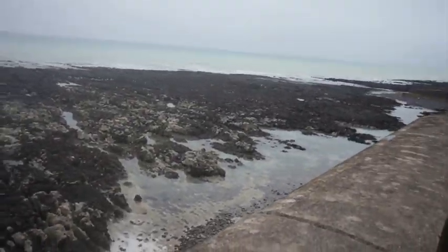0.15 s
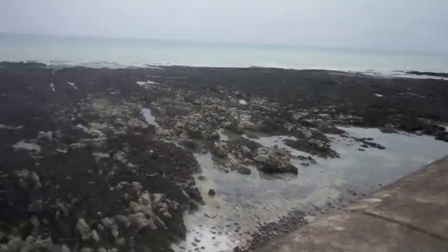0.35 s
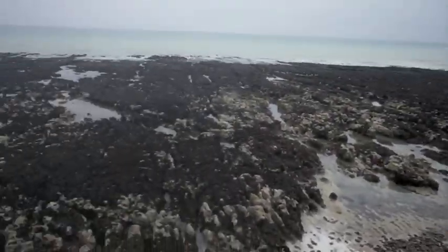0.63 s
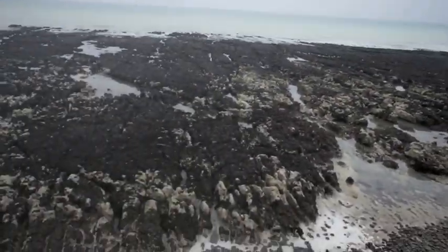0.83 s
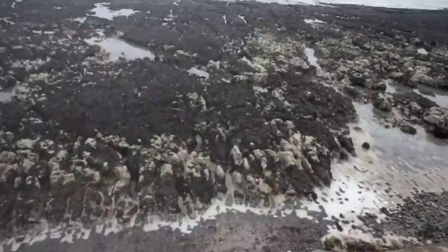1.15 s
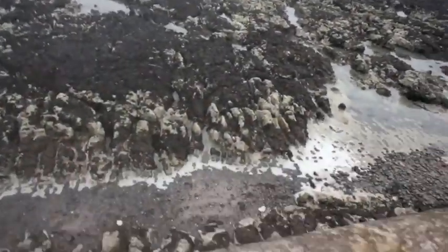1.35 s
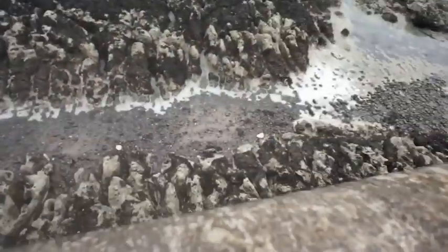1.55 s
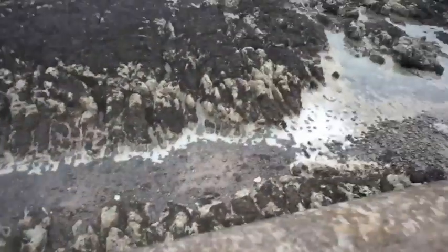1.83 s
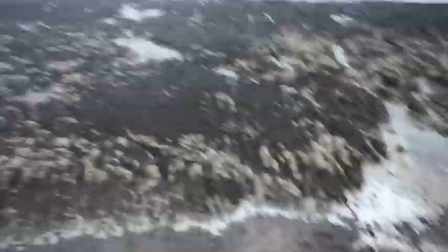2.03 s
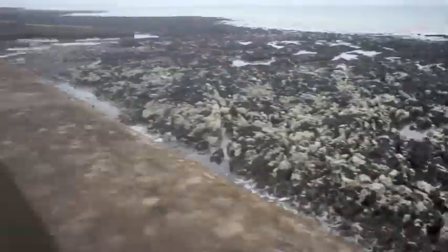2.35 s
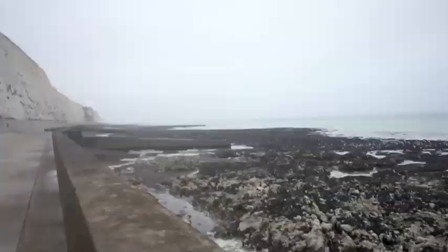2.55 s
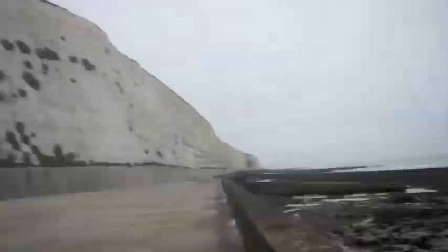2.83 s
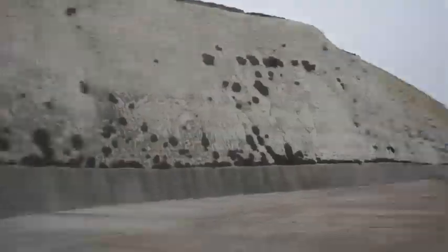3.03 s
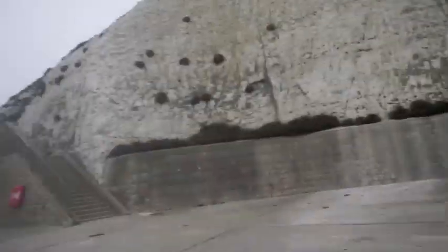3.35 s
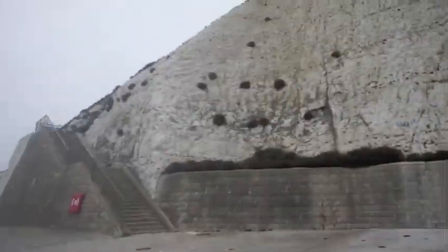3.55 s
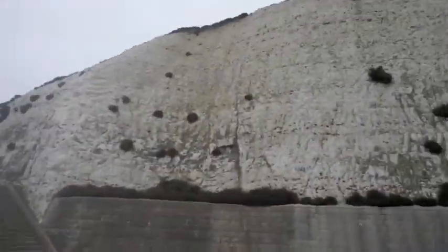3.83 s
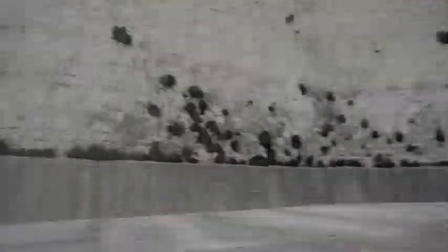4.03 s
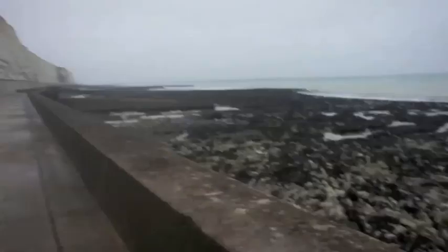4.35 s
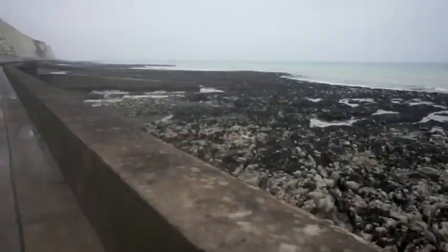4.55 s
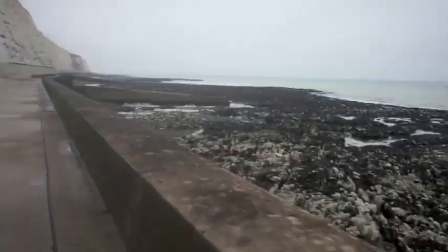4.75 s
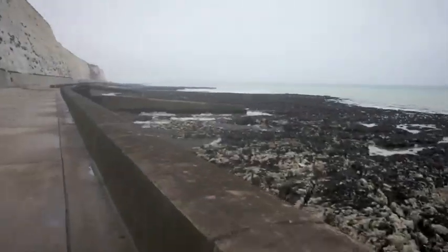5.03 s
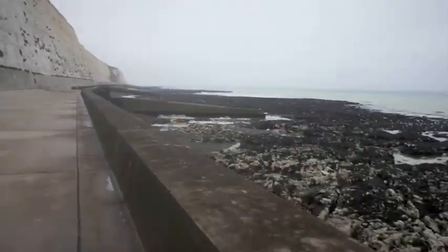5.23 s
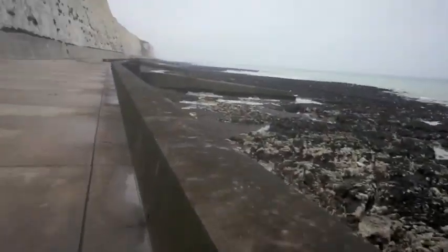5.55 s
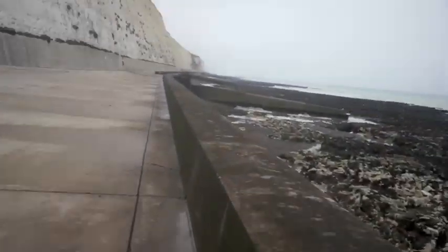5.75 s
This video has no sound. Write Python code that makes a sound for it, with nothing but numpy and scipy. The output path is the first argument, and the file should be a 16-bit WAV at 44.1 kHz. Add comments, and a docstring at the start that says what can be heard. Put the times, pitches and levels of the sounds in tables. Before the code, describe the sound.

A few small birds call close by on a grey rocky shore under a cliff: thin whistles and peeps first, then drawn-out cries, a twittering run, short reedy chips, abrupt squeals and a quick trill that tires. Faint echoes return from hard walls. Distant surf hisses softly. After the first half second wind crackles and thumps on the hand-held microphone, swinging from left to right.

```python
"""Shore birds at a windy sea wall

Under a chalk cliff at low tide, small birds squabble in thin, high, falling chirps that end in a fast trill.
Their voices are harmonic oscillators with gliding pitch; cliff and concrete return faint echoes.
Distant surf is shaped noise. Gusts on the two ports of a hand-held camera are impulsive turbulence and
damped resonances, weak in the bass; inverted crosstalk widens their stereo."""
import sys
import numpy as np
from scipy import signal
from scipy.fft import rfft, irfft, next_fast_len
from scipy.io import wavfile
from scipy.ndimage import uniform_filter1d, minimum_filter1d, map_coordinates

SR = 44100
rng = np.random.default_rng(int(sys.argv[2]) if len(sys.argv) > 2 else 0)


def file_out(sig):
    """Save sig as 16-bit WAV at sys.argv[1]."""
    # one column per channel
    cols = np.atleast_2d(sig).T
    # limit, then scale
    lim = np.clip(cols, -1, 1)
    pcm = np.round(lim * 32767).astype(np.int16)
    wavfile.write(sys.argv[1], SR, pcm)


N = 260190
TOP_HZ = 15900  # upper band limit


def amp(db):
    """Logarithmic level: decibels to amplitude gain."""
    return 10 ** (np.asarray(db) / 20)


def unit(x):
    """Normalization: x at rms 1."""
    return x / np.sqrt(np.mean(x ** 2) + 1e-20)


def along(points, hz):
    """Logarithmic frequency scale: (f/Hz, value) points interpolated at hz."""
    f, v = np.transpose(points)
    return np.interp(np.log(hz + 1), np.log(f + 1), v)


def curves(rows):
    """Linear envelopes: one value per sample for each column after the time."""
    s, *cols = np.transpose(rows)
    return [np.interp(np.arange(N) / SR, s, c) for c in cols]


def wobble(rate):
    """Slow random modulation: a smooth curve through rate random knots a second."""
    knots = rng.standard_normal(int(N * rate / SR) + 4)
    return map_coordinates(knots, [np.arange(N) * rate / SR])


def filtered(x, response):
    """Linear filtering: the spectrum of x times a response of frequency."""
    m = next_fast_len(N + SR // 4)
    return irfft(rfft(x, m) * response(np.fft.rfftfreq(m, 1 / SR)), m)[..., :N]


def panned(left_db):
    """Interchannel level difference: left and right gains of mean power 1."""
    return unit(amp([[left_db / 2], [-left_db / 2]]))


def add(track, s, sound):
    """Superposition: mix a stereo sound into the track from time s."""
    part = track[:, max(round(s * SR), 0):][:, :sound.shape[1]]
    part += sound[:, :part.shape[1]]


def rush(spectrum, alike, patchy_db):
    """Partially coherent noise: shaped stereo noise of rms 1 with patches of random gain."""
    z = signal.stft(rng.standard_normal((2, N)), nperseg=512)[2]
    field = rng.standard_normal(z.shape[1:])
    field = uniform_filter1d(uniform_filter1d(field, size=6, axis=0), size=12, axis=1)
    pair = signal.istft(z * amp(patchy_db * unit(field)), nperseg=512)[1][:, :N]

    def mid_side_response(hz):
        # the mid-side balance sets the correlation of left and right
        angle = np.arccos(np.clip(along(alike, hz), -1, 1)) / 2
        return amp(along(spectrum, hz)) * [np.cos(angle), np.sin(angle)]

    mid, side = filtered(pair, mid_side_response)
    return unit(np.array([mid + side, mid - side]))


# spectra of distant surf and of a fine hiss: (f/Hz, relative density level/dB)
SURF_SPECTRUM = [(25, -31), (150, -28.5), (300, -18), (600, -11), (1100, -1.5), (2000, -2), (3200, -3),
                 (5000, -2), (7000, -20.5), (15000, -42)]
HISS_SPECTRUM = [(200, -40), (1500, -23), (4000, -3), (6000, 3), (9000, 3.5), (11500, -2.5), (13000, -2),
                 (15800, -21)]
# left-right correlation of the surf: (f/Hz, coefficient)
SURF_CORRELATION = [(100, 0.31), (300, 0.2), (700, 0.8), (1400, 0.93), (3000, 0.49), (6000, -0.33)]
# course of both: (t/s, relative surf level/dB, relative hiss level/dB)
SEA_LEVELS = [(0.0, -44, -47.5), (1.95, -48, -49.5), (2.51, -43, -48.5), (2.63, -44, -48.5),
              (3.79, -44.5, -46), (4.42, -46.5, -49.5), (4.83, -43.5, -48.5), (5.29, -44.5, -48),
              (5.62, -43, -49), (5.9, -46.5, -53.5)]


def sea():
    """Broadband noise radiation: far surf with a fine hiss above it."""
    surf_db, hiss_db = curves(SEA_LEVELS)
    surf = amp(surf_db + 6.5) * rush(SURF_SPECTRUM, SURF_CORRELATION, patchy_db=1.5)
    hiss = amp(hiss_db + 10.0) * rush(HISS_SPECTRUM, [(3000, 0.21), (8000, -0.54)], patchy_db=3)
    return surf + hiss


THIRD_HZ, THIRD_SKIRT_HZ = 12650, 700  # resonance of the third partial: centre, half width
ONSET_SHAKE, ONSET_SHAKE_S = 1.63, 0.0079  # extra pitch unsteadiness at the start, its decay time
RASP_HZ = (5000, 13000)  # band of the harsh noise


def voice(pitch, swell_db, db, octave_db, pan_db, shape, sag_db=0, flutter_db=2.0,
          attack=0.0015, release=0.002, port_lag=2.2e-5):
    """Harmonic oscillator: a wavering tone with two overtones and band noise follows a given pitch."""
    t = np.arange(len(pitch)) / SR

    def jitter(rate):
        return map_coordinates(rng.standard_normal(256), [t * rate], mode="wrap")

    # the pitch is shakiest while the voice starts
    unsteady = shape["waver"] * (1 + ONSET_SHAKE * np.exp(-t / ONSET_SHAKE_S))
    wavering = pitch * (1 + unsteady * (jitter(82.8) + 0.81 * jitter(441)))
    phase = 2 * np.pi * np.cumsum(wavering) / SR
    gate = np.clip(t / attack, 0, 1) * np.clip((t[-1] - t) / release, 0, 1)
    swell = gate * amp(3.5 + swell_db + shape["rough_db"] * jitter(522))
    # the sound reaches one port a little before the other
    lead = np.pi * pitch * port_lag * np.array([[-1], [1]])
    # the third partial flares as it crosses its resonance
    off_peak_db = 10 * np.log10(1 + ((3 * pitch - THIRD_HZ) / THIRD_SKIRT_HZ) ** 4)
    levels = [db, octave_db - sag_db, octave_db + shape["third_db"] - off_peak_db]
    tone = 0
    for k, level in enumerate(levels, 1):
        partial = np.sin(k * (phase + lead)) * (k * pitch < TOP_HZ)
        tone = tone + amp(level + flutter_db * jitter(158.0)) * partial
    rasp_band = signal.butter(2, RASP_HZ, "band", fs=SR, output="sos")
    noise = signal.sosfilt(rasp_band, rng.standard_normal((2, SR // 3)))
    rasp = amp(octave_db + shape["rasp_db"]) * noise[:, :len(t)]
    return panned(pan_db) * swell * (tone + rasp)


def chirp(length, crest_hz, db, octave_db, pan_db, shape):
    """Frequency modulation: pitch glides to a crest and drops; the octave weakens away from the crest."""
    t = np.arange(int((length + 0.0011) * SR)) / SR
    fall = min(shape["fall_s"], length)
    rising = np.clip(1 - t / shape["rise_s"], 0, 1)
    falling = np.maximum((t - length) / fall + 1, 0)
    glide = 1 + (shape["start"] - 1) * rising ** 2 + (shape["end"] - 1) * falling ** 1.6
    pitch = crest_hz * glide
    accent_db = shape["accent_db"] * np.sin(np.pi * np.minimum(falling, 1))
    swell_db = shape["onset_db"] * rising ** 2 + shape["tail_db"] * falling ** 2 + accent_db
    sag_db = 66 * np.abs(1 - pitch / crest_hz)
    return voice(pitch, swell_db, db, octave_db, pan_db, shape, sag_db=sag_db)


# reverberation time of the cliff tail: (f/Hz, T60/s)
CLIFF_T60 = [(3000, 0.48), (6000, 0.2), (11000, 0.26), (15000, 0.12)]


def cliff(x, early_db=4, early_t60=0.18):
    """Diffuse reflection: quick scatter off wall and rocks, then a weak tail shorter in the treble."""
    hz, t, z = signal.stft(rng.standard_normal((2, SR // 3)), SR, nperseg=256)
    late = amp(-60 * t / along(CLIFF_T60, hz)[:, None])
    early = amp(early_db - 60 * t / early_t60)
    tail = signal.istft(z * (late + early), SR, nperseg=256)[1]
    tail = tail * np.clip(np.arange(tail.shape[1]) / SR / 0.0085, 0, 1)
    return signal.fftconvolve(x, tail / np.linalg.norm(tail[0]), axes=1)


# hard surfaces near by: (nominal delay t/s, relative level/dB)
WALL_ECHOES = [(.0065, -26), (.012, -14.5), (0.025, -21.5), (.037, -20.5)]


def add_echoing(track, s, call, wet_db, cliff_db=-8, path_scatter=.1):
    """Specular and diffuse reflection: a call, its cliff blur and wall echoes whose paths vary by call."""
    add(track, s, call)
    add(track, s, amp(cliff_db + wet_db) * cliff(call))
    for delay, db in WALL_ECHOES:
        path_s = delay * (1 + path_scatter * rng.standard_normal())
        add(track, s + path_s, amp(db + wet_db) * call[::-1])  # mirrored left to right


def chirps(rows, shape):
    """Superposition: every chirp of one kind, with its echoes."""
    track = np.zeros((2, N))
    for s, *row in rows:
        add_echoing(track, s, chirp(*row, shape), shape["wet_db"])
    return track


# Keys of every call shape: glide and drop times, start and end pitch over the crest, start level,
# accent halfway down the drop, level at its end, third partial against the octave, pitch unsteadiness,
# fast level flutter, harsh noise against the octave, echo strength.
# whistles: (t/s, length t/s, settled f/Hz, relative level/dB)
WHISTLES = [(0, 0.27, 8630, -47), (0.492, 0.057, 8750, -55), (.66, .08, 8450, -46), (0.8, .1, 8270, -50),
            (5.79, 0.17, 8300, -34.5)]
WHISTLE = dict(rise_s=0.063, fall_s=0.026, start=1.11, end=0.37, onset_db=-8, accent_db=2, tail_db=-3,
               third_db=-40, waver=0.0055, rough_db=2, rasp_db=-20, wet_db=-0.5)


def whistles():
    """Nearly pure tones: thin whistles slide down, settle and drop."""
    rows = [(s, length, hz, db, db - 40, 0) for s, length, hz, db in WHISTLES]
    return chirps(rows, WHISTLE)


# peeps: (t/s, length t/s, crest f/Hz, relative fundamental level/dB, relative octave level/dB, L-R level/dB)
PEEPS = [(.315, 0.067, 5860, -34, -24, -7), (.716, 0.073, 5820, -30.5, -22.5, 1.5),
         (1.126, 0.066, 5595, -32.5, -24, -0.5), (1.371, 0.071, 5600, -36.5, -27, 0.5),
         (1.626, 0.054, 5700, -34.5, -22, -1), (1.764, 0.085, 5590, -40, -45, -2),
         (1.816, 0.06, 5720, -40, -27, 1), (1.925, 0.063, 5710, -35, -32, -5),
         (2.006, 0.073, 5510, -41, -32, -1), (2.1, 0.056, 5650, -29.5, -30, -5),
         (2.183, 0.089, 5590, -58, -35.5, -4), (2.712, 0.14, 5450, -52, -38.5, -9),
         (2.94, 0.084, 5500, -59, -40, -9), (3.125, 0.071, 5640, -58, -41, -3),
         (3.86, .06, 5350, -55, -44, 0), (4.05, .06, 5450, -54, -43, 0), (4.26, .06, 5400, -58, -45, -2),
         (4.45, .06, 5420, -58, -46.5, 0), (4.689, 0.045, 5800, -31.5, -36.5, 1),
         (4.73, 0.031, 4920, -32.5, -40, 1)]
PEEP = dict(rise_s=0.0119, fall_s=.055, start=0.93, end=.88, onset_db=-12, accent_db=2, tail_db=-3.5,
            third_db=7, waver=0.0059, rough_db=1.5, rasp_db=-24.5, wet_db=-2)


def peeps():
    """Downward frequency modulation: slow falling peeps."""
    return chirps(PEEPS, PEEP)


# spectrum of wind on a port: (f/Hz, relative density level/dB)
PORT_SPECTRUM = [(25, -40), (110, -39), (170, -32), (250, -22.5), (370, -12.5), (550, -5.5), (800, -0.5),
                 (1100, -0.5), (1600, -5), (2200, -14.5), (3200, -27), (5000, -50), (12000, -77)]


def port(drive, tilt_db, cross=0.3):
    """Spectral colouring: ports shape the turbulence; inverted crosstalk widens the stereo."""
    def colour(hz):
        octaves = np.log2(np.clip(hz, 600, 3000) / 1000)
        return unit(amp(along(PORT_SPECTRUM, hz) + tilt_db * octaves))

    sound = filtered(drive, colour)
    return sound - cross * sound[::-1]


def eddies(count, rate=1100, hiss_db=-21):
    """Poisson-like impulse noise: irregular tiny slaps over a little smooth noise, apart on each port."""
    slap_gains = (rng.random((2, count)) < rate / SR) + amp(hiss_db)
    return np.array([unit(side) for side in slap_gains * rng.standard_normal((2, count))])


# which port faces the wind as the camera turns: (t/s, L-R level/dB before widening)
WINDWARD = [(0.5, 13), (0.65, 12), (2.17, 11), (2.42, -2.5), (2.98, 6.5), (3.01, -10), (3.4, -15),
            (4.24, -8), (4.32, 4.5), (5.3, 2.5), (5.4, -20), (5.46, 5), (5.52, -17), (5.57, 1),
            (5.85, -1.5), (5.9, 1)]


def windward():
    """Directional exposure: the level difference between the ports at each sample."""
    return curves(WINDWARD)[0]


# lulls in the breeze: (t/s, length t/s)
LULLS = [(0.678, 0.072), (1.221, 0.05), (1.715, 0.028), (1.894, 0.034), (2.142, 0.015), (2.876, 0.027),
         (3.318, 0.011), (4.536, .04), (5.035, .068), (5.343, 0.043), (5.683, .045)]


def lulls(depth_db=-7.5, edge_s=0.0035):
    """Amplitude modulation: the gain of the breeze falls away in each lull."""
    t = np.arange(N) / SR
    dips = sum(np.clip(np.minimum(t - s, s + length - t) / edge_s + .5, 0, 1) for s, length in LULLS)
    return amp(depth_db * dips)


# wind between gusts: (t/s, relative level/dB)
BREEZE = [(0.5, -44.5), (0.83, -40), (0.96, -36.5), (1.21, -40.5), (1.6, -35.5), (1.85, -40.5),
          (2.15, -36.5), (2.47, -42.5), (3.24, -45), (3.4, -37.5), (3.79, -41), (4.14, -44.5), (4.29, -38),
          (4.82, -40), (5.18, -42.5), (5.9, -36.5)]
BREEZE_DB, BREEZE_FROM_S, BREEZE_LUMPS_DB = 5.5, 0.434, 4  # gain, when it gets up, quick random swings


def breeze(fine_db=-0.5, stray_db=-9):
    """Turbulent pressure noise: a lumpy breeze crackles with dense and stray eddies."""
    t = np.arange(N) / SR
    sides = amp(windward() * np.array([[.5], [-.5]]))
    sides = sides / np.sqrt(np.mean(sides ** 2, axis=0))
    level = amp(curves(BREEZE)[0] + BREEZE_DB + BREEZE_LUMPS_DB * wobble(60))
    level = level * lulls() * np.clip((t - BREEZE_FROM_S) / 0.047, 0, 1)
    crackle = amp(fine_db) * eddies(N) + amp(stray_db) * eddies(N, rate=160, hiss_db=-54)
    return port(level * sides * crackle, tilt_db=-6.0)


# gusts on the ports: (t/s, length t/s, relative level/dB)
PUFFS = [(0.478, 0.093, -31.5), (1.151, 0.026, -28.5), (1.392, 0.051, -30), (1.523, 0.049, -32.5),
         (1.567, 0.033, -31), (1.614, 0.04, -35), (1.747, 0.029, -34), (1.83, 0.069, -29),
         (2.008, 0.053, -28.5), (2.09, 0.05, -32.5), (2.161, 0.06, -24.5), (2.208, 0.037, -28),
         (2.326, 0.042, -27.5), (2.549, 0.031, -35.5), (2.908, 0.087, -26), (3.229, 0.1, -27),
         (3.356, 0.086, -25), (3.466, 0.13, -28), (3.72, 0.066, -28), (4.007, 0.03, -22.5),
         (4.097, 0.14, -27), (4.229, 0.034, -30), (4.3, 0.053, -24), (4.343, 0.036, -28),
         (4.381, 0.07, -28), (4.466, 0.024, -29), (4.582, 0.038, -29.5), (4.678, 0.18, -27.5),
         (4.916, 0.028, -27.5), (4.959, 0.049, -29), (5.125, 0.047, -28), (5.195, 0.067, -26.5),
         (5.256, 0.064, -26.5), (5.4, 0.037, -30.5), (5.447, 0.053, -30.5), (5.505, 0.053, -31.5),
         (5.592, 0.044, -17.5), (5.733, 0.065, -21), (5.852, 0.06, -23)]
PUFF_DB, PUFF_ATTACK_S, PUFF_RELEASE_S, PUFF_SAG_DB = -0.8, 0.0078, 0.013, 0.5  # gain, edges, loss over length


def puffs(half_hard_db=-25, blend_db=1.5, side_gain=1.84, flutter_db=1.5):
    """Level-dependent spectrum: the harder a gust blows, the brighter its sputter."""
    t = np.arange(N) / SR
    soft, hard = np.zeros((2, N)), np.zeros((2, N))
    side_db = windward()
    flutter = amp(flutter_db * wobble(130))
    for s, length, db in PUFFS:
        u = t[:int(length * SR)]
        edges = np.clip(u / PUFF_ATTACK_S, 0, 1) * np.clip((length - u) / PUFF_RELEASE_S, 0, 1)
        shape = edges * amp(-PUFF_SAG_DB * u / length) * np.interp(s + u, t, flutter)
        sputter = np.array([unit(side) for side in shape * eddies(len(shape))])
        pan_db = side_gain * np.interp(s + length / 2, t, side_db)
        blow = amp(db + PUFF_DB) * panned(pan_db) * sputter
        hard_share = 1 / (1 + np.exp((half_hard_db - db) / blend_db))
        add(soft, s, np.sqrt(1 - hard_share) * blow)
        add(hard, s, np.sqrt(hard_share) * blow)
    return port(soft, tilt_db=-6.0) + port(hard, tilt_db=10.0)


# hard eddies: (t/s, relative level/dB, nominal ring f/Hz, L-R level/dB before widening)
SLAPS = [(0.485, -18, 1580, 11), (0.502, -12.5, 665, 3), (0.53, -9.5, 804, 4), (0.627, -16.5, 770, 3),
         (0.768, -18, 970, 7), (0.797, -15.5, 870, 9.5), (0.823, -22, 1160, 8.0), (0.855, -11.5, 1090, 7),
         (0.881, -20, 867, 8.0), (0.899, -16.5, 767, 5), (0.931, -17, 929, 4), (0.95, -18, 993, 4),
         (0.969, -16, 715, 8), (1.032, -13, 832, 6), (1.073, -17, 1150, 12), (1.09, -14, 729, 9.5),
         (1.112, -15.5, 674, 8), (1.156, -13, 845, 11), (1.171, -15, 1020, 8), (1.206, -17, 950, 10),
         (1.251, -21, 794, 7), (1.303, -8.5, 980, 5), (1.345, -21, 720, 8.5), (1.394, -16, 842, 7),
         (1.411, -17, 1230, 9), (1.421, -22, 1160, 10), (1.46, -18, 888, 8), (1.49, -30, 800, 9),
         (1.539, -20, 1030, 10.5), (1.552, -23, 1010, 9.5), (1.59, -21, 890, 13), (1.632, -17, 689, 9),
         (1.644, -26, 926, 8.5), (1.689, -12.5, 1020, 10.5), (1.699, -25, 1030, 8.5), (1.794, -15, 824, 6),
         (1.838, -9.5, 730, 8), (1.861, -16, 953, 10), (1.87, -11, 1190, 14), (1.879, -13, 1060, 9),
         (1.984, -21.5, 930, 8.0), (2.015, -14.5, 791, 10), (2.027, -12.5, 670, 9),
         (2.045, -14.5, 800, 9.5), (2.086, -12.5, 727, 10.0), (2.104, -17, 700, 9.5),
         (2.124, -17.5, 646, 10), (2.165, -15, 1780, 13), (2.179, -26, 1080, 9.5), (2.206, -18, 972, 9.5),
         (2.223, -20, 746, 11), (2.334, -19, 940, 10), (2.351, -11, 1410, 7), (2.494, -17, 890, 1.5),
         (2.53, -23, 890, 1), (2.563, -15, 800, 11), (2.925, -8.5, 800, 12), (3.42, -16, 1150, -13),
         (3.739, -12, 1560, -10), (3.97, -14, 910, -8.0), (4.018, -19, 869, -10.0), (4.119, -9, 1160, -13),
         (4.164, -13, 1070, -6), (4.198, -11, 1380, -6), (4.306, -12, 816, 8.5), (4.318, -13, 950, 6),
         (4.328, -10, 1650, 10.0), (4.398, -11, 1190, 15), (4.41, -10, 1050, 12), (4.423, -13, 910, 8),
         (4.492, -15.5, 1070, 1), (4.506, -9, 1270, 13), (4.525, -17.5, 1240, 2), (4.594, -14, 1020, 11),
         (4.651, -13, 1020, 8), (4.656, -8, 1110, 11), (4.66, -8, 1070, 4), (4.743, -10, 1470, 10),
         (4.765, -20, 1210, -2), (4.801, -9.5, 1030, 4), (4.82, -14, 930, 10.5), (4.824, -11, 1290, 7),
         (4.833, -10.5, 925, 7.0), (5.001, -12.5, 1040, 11), (5.016, -7, 1000, 13), (5.221, -17, 832, 2),
         (5.454, -13.5, 1500, 11), (5.474, -12.5, 1080, 7), (5.511, -12, 636, -15), (5.594, -12, 1630, 3.5),
         (5.614, -23, 1450, 5), (5.652, -11, 700, -12), (5.743, -15, 1250, 4), (5.747, -12, 920, -1),
         (5.779, -10.5, 724, -12), (5.821, -9, 1830, 6)]
SLAP_DB, SLAP_T60_S, SLAP_ATTACK_S = -6, 0.0084, 0.00042  # gain, ring time, edge
SLAP_AGAIN_S, SLAP_AGAIN_DB = 0.00308, -4  # mean delay and gain of the smaller eddy that follows
CRACK_DB, CRACK_T60_S = 3.5, 0.0047  # the sharp noise that starts a slap


def slaps(side_gain=2.4, scatter=0.076):
    """Damped resonance: each hard eddy cracks and rings each port for a few cycles at its own pitch."""
    drive, t = np.zeros((2, N)), np.arange(SR // 40) / SR
    fade = (1 - np.exp(-t / SLAP_ATTACK_S)) * amp(-60 * t / SLAP_T60_S)
    for s, db, hz, pan_db in SLAPS:
        again_s = SLAP_AGAIN_S * (.5 + rng.random())
        for delay, drop_db in [(0, 0), (again_s, SLAP_AGAIN_DB)]:
            ring_hz = hz * np.exp(scatter * rng.standard_normal((2, 1)))
            ring = np.sin(2 * np.pi * (ring_hz * t + rng.random((2, 1))))
            crack = amp(CRACK_DB - 60 * t / CRACK_T60_S) * rng.standard_normal(ring.shape)
            gains = amp(db + SLAP_DB + drop_db) * panned(side_gain * pan_db)
            add(drive, s + delay, gains * (fade * ring + crack))
    return port(drive, tilt_db=5.5)


# chips: (t/s, length t/s, crest f/Hz, relative fundamental level/dB, relative octave level/dB, L-R level/dB)
CHIPS = [(.783, 0.017, 5050, -34, -54, 1), (1.18, 0.022, 4800, -38, -48, 0),
         (1.39, 0.046, 4480, -44, -54, 2), (1.586, 0.049, 4410, -44, -48.5, 3),
         (1.69, 0.027, 5100, -42.5, -48, -1), (2.667, 0.025, 5380, -28.5, -59, 6),
         (2.752, .022, 5050, -45, -50, -5), (2.846, 0.022, 4455, -29.5, -33, -1),
         (1.981, .024, 5030, -38, -52, -2), (3.04, 0.028, 4630, -38, -44.5, -2),
         (3.135, .03, 4600, -38.5, -58, -3), (3.21, .026, 4700, -42, -56, -2),
         (3.303, 0.037, 4476, -26.5, -37, 3), (3.498, 0.037, 4750, -35.5, -44.5, 2),
         (3.7, 0.031, 4700, -33, -55, 2), (3.943, 0.034, 4620, -36.5, -41.5, 6),
         (4.238, .036, 4630, -41.5, -46, -7), (4.69, 0.046, 4400, -34.5, -46, -4),
         (5.19, 0.033, 4370, -37, -50, -5), (5.305, .018, 4950, -39, -47, -2),
         (5.368, .016, 4870, -37, -47, -2)]
CHIP = dict(rise_s=0.0086, fall_s=0.0256, start=0.91, end=0.84, onset_db=-7, accent_db=3, tail_db=-11.5,
            third_db=2, waver=0.0053, rough_db=0, rasp_db=2, wet_db=-1)


def chips():
    """Tone with added noise: short reedy chips, mostly from a lower voice."""
    return chirps(CHIPS, CHIP)


# level notes: columns as for the chips
NOTES = [(1.635, 0.12, 4100, -53, -62, 2), (1.916, 0.0063, 4500, -37, -55, -3),
         (2.074, 0.0077, 4180, -36.5, -55, -6), (3.687, 0.018, 5380, -33.5, -44, 5),
         (3.72, 0.25, 4470, -47.5, -51.5, 0), (4.26, .14, 4400, -54, -62, -3),
         (4.57, 0.067, 4490, -50, -61, 0), (5.081, 0.052, 4350, -48, -31, 0),
         (5.188, 0.01, 5140, -35, -46, 1), (5.2, .2, 5100, -48, -62, 0)]
NOTE = dict(rise_s=0.00456, fall_s=0.015, start=0.718, end=0.97, onset_db=-7, accent_db=2.5, tail_db=2,
            third_db=-9, waver=0.0033, rough_db=-0.5, rasp_db=-4, wet_db=1)


def notes():
    """Steady oscillation: after a quick upward swoop each note stays level."""
    return chirps(NOTES, NOTE)


# squeals: (t/s, length t/s, first f/Hz, last f/Hz, relative fundamental level/dB,
# relative octave level/dB, L-R level/dB)
SQUEALS = [(1.67, 0.022, 5150, 5080, -48, -30, -1), (2.081, 0.025, 5490, 5400, -26.5, -32.5, -6),
           (4.857, 0.012, 5000, 5470, -24, -30.5, 2), (4.868, 0.037, 5980, 5890, -19.5, -25, 8),
           (4.906, 0.04, 5030, 5140, -29.5, -36, 3), (4.949, 0.014, 6300, 6300, -27.5, -31, 7),
           (4.963, 0.012, 5840, 5400, -21, -31, 5), (4.972, .014, 5120, 4600, -26, -29.5, 3),
           (5.049, 0.0247, 5850, 6100, -32, -29.5, 1), (5.071, 0.037, 6330, 6130, -34, -43, 1),
           (5.125, .008, 5300, 4360, -24.5, -34, -1), (5.155, 0.016, 4950, 4980, -24.5, -38, 1)]
SQUEAL = dict(third_db=6, waver=0.0048, rough_db=0.5, rasp_db=-19, wet_db=-5)


def squeals():
    """Register jumps: the voice leaps between straight notes that start and stop abruptly."""
    track = np.zeros((2, N))
    for s, length, first_hz, last_hz, db, octave_db, pan_db in SQUEALS:
        pitch = np.linspace(first_hz, last_hz, int((length + 0.0016) * SR))
        add_echoing(track, s, voice(pitch, 0, db, octave_db, pan_db, SQUEAL), SQUEAL["wet_db"])
    return track


# cries: columns as for the chips
CRIES = [(2.222, 0.097, 5490, -30.5, -38, 0), (2.377, 0.14, 5435, -30.5, -33.5, -3),
         (2.574, .099, 5480, -28.5, -36, -2.5)]
CRY = dict(rise_s=0.003, fall_s=0.024, start=1.1, end=0.7, onset_db=2, accent_db=5, tail_db=-11,
           third_db=-20, waver=0.0092, rough_db=2, rasp_db=-24, wet_db=-2)


def cries():
    """Terminal glide: drawn-out cries end in a quick drop of pitch."""
    return chirps(CRIES, CRY)


# twitter: columns as for the chips
TWITTER = [(2.706, 0.044, 5410, -29, -40, -5), (2.786, 0.047, 5250, -32.5, -43, -5),
           (2.871, 0.046, 5330, -33, -42.5, -4), (2.956, 0.049, 5280, -38, -46, -5),
           (3.034, .043, 5270, -39.5, -44, -5), (3.12, 0.047, 5200, -38, -51, -5),
           (3.196, 0.039, 5250, -39.5, -49, 0)]
TWIT = dict(rise_s=0.0151, fall_s=0.013, start=.83, end=.76, onset_db=-5, accent_db=5.5, tail_db=-1.5,
            third_db=0, waver=0.0156, rough_db=2, rasp_db=-5, wet_db=1.5)


def twitter():
    """Arched frequency modulation: a run of calls that rise and fall."""
    return chirps(TWITTER, TWIT)


# overtones of the croak: (multiple of the base pitch, relative level/dB)
CROAK_PARTIALS = [(3, -33), (4, -28), (5, -37), (6, -32), (7, -29.5), (8, -37), (9, -39)]


def croak(s=2.833, length=.027, base_hz=1480, sag=0.028, waver=0.0068):
    """Subharmonic voicing: at a third of its usual pitch the voice buzzes with a row of overtones."""
    u = np.linspace(0, 1, int(length * SR))
    pitch = base_hz * (1 - sag * u ** 2 + waver * wobble(500)[:len(u)])
    phase = 2 * np.pi * np.cumsum(pitch) / SR
    buzz = sum(amp(db) * np.sin(round(k) * phase + 2 * np.pi * rng.random()) for k, db in CROAK_PARTIALS)
    call = panned(1) * np.sqrt(np.abs(np.sin(np.pi * u))) * buzz
    track = np.zeros((2, N))
    add_echoing(track, s, call, wet_db=-2)
    return track


def hoot(s=4.667, length=0.014, start_hz=915, end_hz=1420, db=-25.5, pan_db=18):
    """Sustained port resonance: one brief hoot of rising pitch."""
    pitch = np.linspace(start_hz, end_hz, int(length * SR))
    tone = np.sin(np.linspace(0, np.pi, len(pitch))) * np.sin(2 * np.pi * np.cumsum(pitch) / SR)
    drive = np.zeros((2, N))
    add(drive, s, amp(db) * panned(pan_db) * tone)
    return port(drive, tilt_db=5.5)


# trill: columns as for the chips
TRILL = [(5.167, 0.023, 5880, -25, -25.5, 2), (5.217, .033, 5760, -28, -29.5, 1),
         (5.277, 0.031, 5680, -27.5, -28, 0), (5.339, 0.028, 5710, -26.5, -27, -0.5),
         (5.399, .03, 5640, -28.5, -29, -2), (5.462, 0.03, 5720, -30.5, -31, -1),
         (5.526, .029, 5770, -30.5, -31.5, -2), (5.591, 0.029, 5780, -36, -38, -3),
         (5.66, 0.027, 5720, -34.5, -33, -5)]
TICK = dict(rise_s=0.0144, fall_s=.0165, start=0.93, end=0.71, onset_db=-4.5, accent_db=6.5, tail_db=-2,
            third_db=-7, waver=0.0138, rough_db=2.5, rasp_db=-27, wet_db=1)


def trill():
    """Rapid repetition: a fast run of falling ticks that slows and tires."""
    return chirps(TRILL, TICK)


def birds():
    """Superposition: all the calls with their echoes."""
    flock = whistles() + peeps() + chips() + notes() + squeals() + cries() + twitter() + croak() + trill()
    return amp(-0.5) * flock


def scene():
    """Superposition: sea, birds and wind together."""
    return sea() + birds() + breeze() + puffs() + slaps() + hoot()


def record(dry):
    """Peak limiting and band limiting: a fast limiter holds down peaks; nothing passes above TOP_HZ."""
    needed = np.minimum(1, .83 / (np.abs(dry).max(axis=0) + 1e-9))
    gain = uniform_filter1d(minimum_filter1d(needed, size=181), size=181)
    return filtered(dry * gain, lambda hz: np.clip((TOP_HZ - hz) / 100, 0, 1))


dry = scene()
out = record(dry)
file_out(out)
```